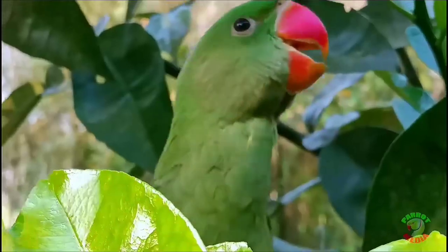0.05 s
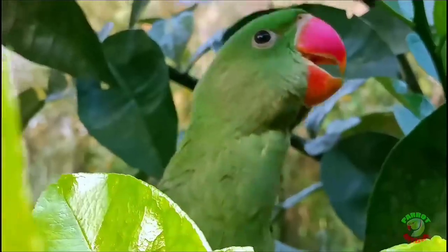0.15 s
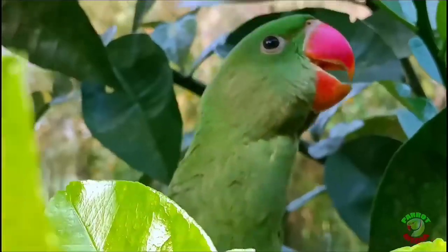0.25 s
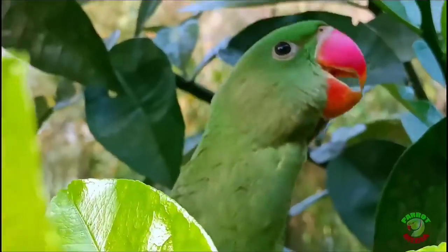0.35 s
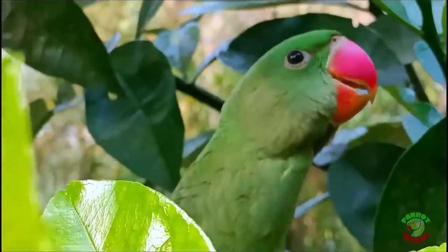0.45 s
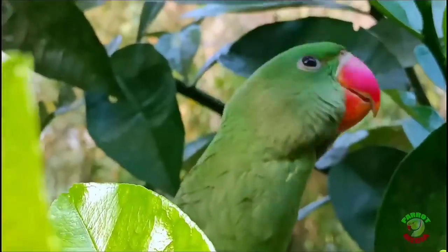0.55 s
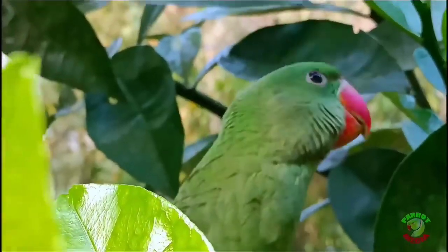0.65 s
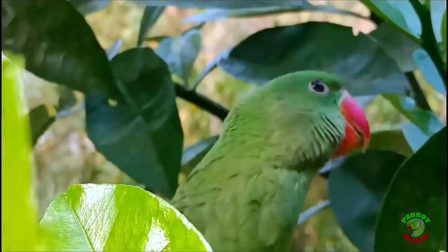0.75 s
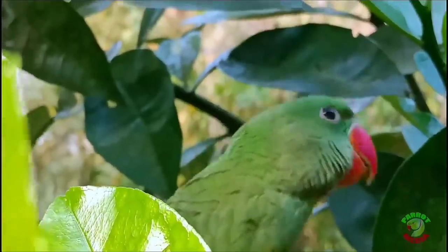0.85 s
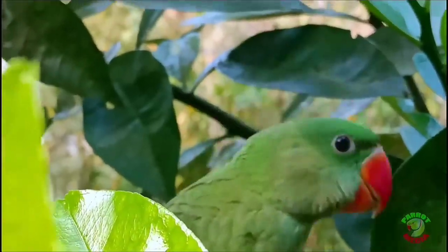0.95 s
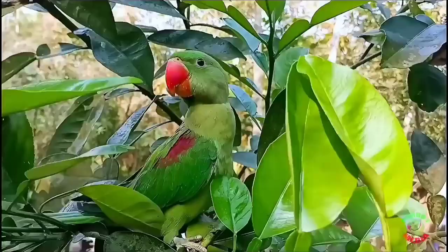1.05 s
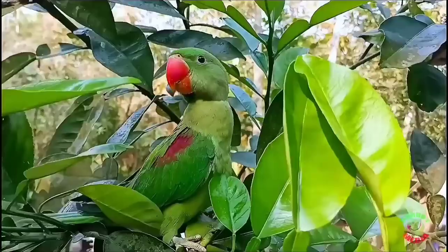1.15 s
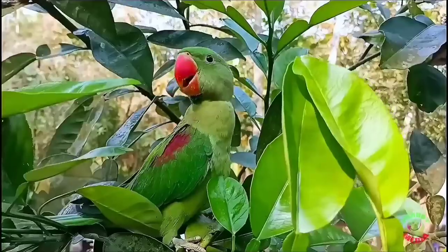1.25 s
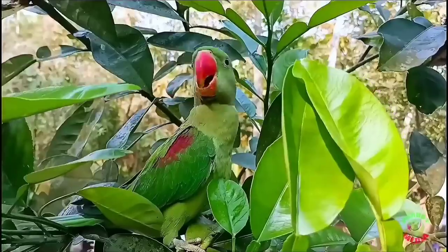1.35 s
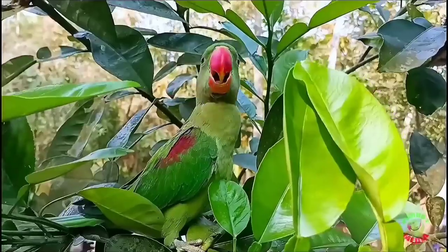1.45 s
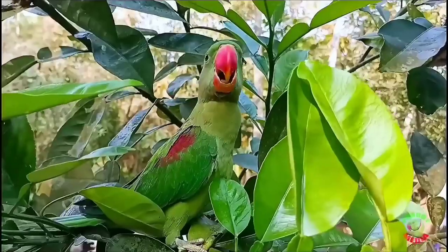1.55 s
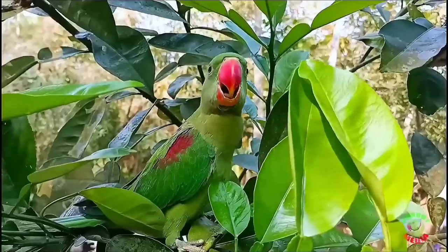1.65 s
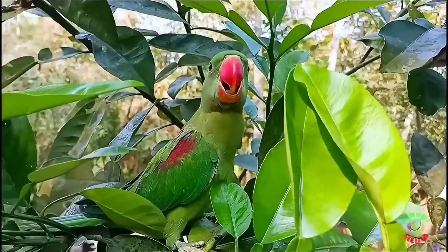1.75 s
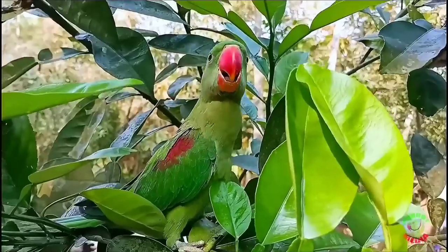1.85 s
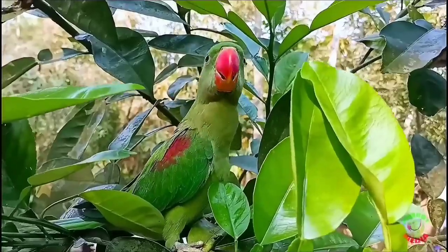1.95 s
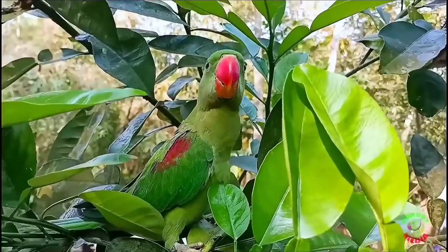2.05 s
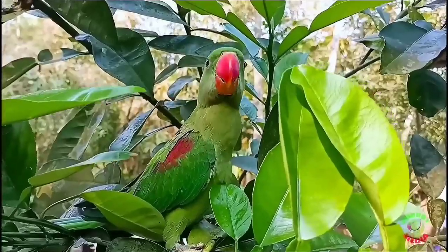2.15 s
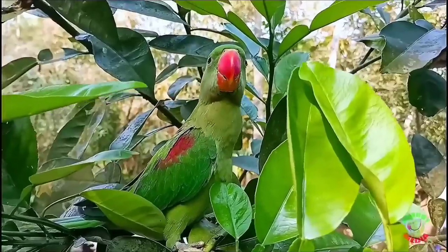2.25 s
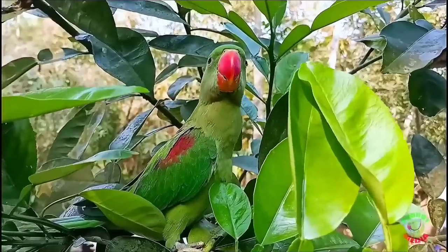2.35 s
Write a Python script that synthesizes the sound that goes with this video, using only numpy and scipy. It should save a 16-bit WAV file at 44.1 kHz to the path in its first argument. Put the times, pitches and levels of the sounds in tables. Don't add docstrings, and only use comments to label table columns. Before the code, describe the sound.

Two harsh parakeet calls of over half a second, buzzing and falling in pitch, separated by a quiet pause with tiny distant whistles and light rustle. Leafy outdoors, near stereo pickup, slightly overloaded, with faint echoes.

```python
import sys
import numpy as np
from scipy import signal
from scipy.fft import rfft, irfft
from scipy.io import wavfile
from scipy.ndimage import uniform_filter1d

SR = 44100
rng = np.random.default_rng(int(sys.argv[2]) if len(sys.argv) > 2 else 0)


def unload_audio(sound):
    columns = np.transpose(np.atleast_2d(sound))
    steps = np.round(np.clip(columns, -1, 1) * 32767)
    wavfile.write(sys.argv[1], SR, steps.astype(np.int16))


def makeup_ratio(level_db):
    decades = np.asarray(level_db, float) / 20
    return 10 ** decades


N = 108045


def evened(x):
    return x / np.sqrt(np.mean(abs(x) ** 2) + 1e-20)


def read(points, hz):
    f, value = np.transpose(points)
    return np.interp(np.log(hz + 1), np.log(f + 1), value)


def envelope(points, t):
    return np.interp(t, *np.transpose(points))


def smooth_noise(shape, hz):
    pole = np.exp(-2 * np.pi * hz / SR)
    z = rng.standard_normal(shape) + 1j * rng.standard_normal(shape)
    return evened(signal.lfilter([1], np.poly([pole] * 3), z))


def throbbing_pitch(curve, t, along):
    s, throbs, crest_hz, trough_hz = np.transpose(curve)
    turn = np.interp(t, s, throbs) % 1
    fall = np.clip(0.4 + 0.5 * along, 0.2, 0.8)
    phase = np.where(turn < fall, turn / fall, (1 - turn) / (1 - fall))
    low = np.sin(np.pi / 2 * phase) ** 2
    floor_hz = np.interp(t, s, trough_hz)
    hz = np.interp(t, s, crest_hz) * (1 - low) + floor_hz * low
    return hz * (1 + 0.003 * smooth_noise(len(t), 84).real), floor_hz


def syrinx(curve, t, along):
    pitch_hz, floor_hz = throbbing_pitch(curve, t, along)
    k = np.arange(1, 17)[:, None]
    hz = k * pitch_hz
    cycles = k * np.cumsum(pitch_hz) / SR + 0.0875 * k ** 3.0
    wave = np.exp(2j * np.pi * cycles) * (hz < SR / 2.6)
    wave = wave * makeup_ratio(2.2 * smooth_noise(wave.shape, 62).real)
    snap_db = 0.0356 * (pitch_hz - floor_hz) * along ** 2
    warm_up_db = -20 * np.clip(1 - (t - curve[0][0]) / 0.042, 0, 1) ** 0.5
    return hz, wave * makeup_ratio((snap_db + warm_up_db) * (k > 1))


def pipe_gain(pipe, mid_db, dips, hz, along):
    power, dip_db = 0, 0
    for (f, half_hz, early_db, late_db), bulge_db in zip(pipe, mid_db):
        peak_db = early_db + (late_db - early_db) * along + 4.6 * bulge_db * along * (1 - along)
        power = power + (makeup_ratio(peak_db) / (1 + ((hz - f) / half_hz) ** 2) ** 1.6) ** 2
    for f, half_hz, early_db, late_db in dips:
        depth_db = np.minimum(early_db + (late_db - early_db) * along, 0)
        dip_db = dip_db + depth_db / (1 + ((hz - f) / half_hz) ** 2)
    return np.sqrt(power) * makeup_ratio(dip_db)


# f/Hz, level/dB
RASP_FLOOR = [
    [(1800, -54), (2900, -42.5), (5000, -34.5), (8000, -39.5), (11500, -36), (15500, -45.5)],
    [(1800, -50), (2900, -27), (6500, -34), (8000, -38.5), (11500, -38.5), (15500, -38.5)],
]


def screech(curve, effort, pipes, mid_db, dips, lead):
    start_s, end_s = curve[0][0], curve[-1][0]
    at = np.arange(round(start_s * SR), round(end_s * SR))
    t = at / SR
    along = (t - start_s) / (end_s - start_s)
    hz, wave = syrinx(curve, t, along)
    k = np.arange(1, 17)[:, None]
    rasp_hz, rasp_same = 550, 0.5
    shared = smooth_noise(wave.shape, rasp_hz)
    depth = makeup_ratio(-19) * np.minimum(k / 3, 1)
    drift = np.clip(1.277 * along - 0.25, 0, 1)
    loudness = makeup_ratio(envelope(effort, t)) * np.minimum((end_s - t) / 0.0071, 1)
    out = np.zeros((2, N))
    for side, pipe in enumerate(pipes):
        own = smooth_noise(wave.shape, rasp_hz)
        rasp = rasp_same * shared + np.sqrt(1 - rasp_same ** 2) * own
        gain = pipe_gain(pipe, mid_db[side], dips[side], hz, drift)
        tones = gain * wave * (1 + depth * rasp)
        tones = tones + makeup_ratio(read(RASP_FLOOR[side], hz)) * wave * rasp
        tones = tones * np.exp(1j * (1 - side) * read(lead, hz))
        out[side, at] = tones.sum(0).real * loudness
    return out


# t/s, throbs done, crest f/Hz, trough f/Hz
FIRST_PITCH = [(.172, -2.2, 1320, 1290), (.196, -1.5, 1480, 1400), (.216, -1, 1670, 1575),
               (.246, 0, 1785, 1520), (.323, 2, 1690, 1310), (.401, 4, 1575, 1215), (.563, 8, 1325, 1100),
               (.65, 10, 1120, 1042), (.7, 11.1, 1066, 1000), (.738, 12, 930, 920)]
# t/s, level/dB
FIRST_EFFORT = [(0.17, -13), (0.193, 0), (0.21, 5.5), (0.253, -0.5), (.33, -1), (.45, -4.5), (.6, -5.5),
                (0.718, -10), (0.739, -39)]
# f/Hz, half width/Hz, early level/dB, late level/dB
FIRST_LEFT_PIPE = [(1510, 720, -28, -30.5), (2350, 1070, -13, -7), (3420, 186, -3.5, -13),
                   (4322, 233, -7.5, -2), (5736, 310, -13, -25.5), (6000, 230, -39, -35.5)]
FIRST_RIGHT_PIPE = [(1730, 1320, -23.5, -24), (2180, 190, -7.5, -9), (3207, 250, -8.5, -10),
                    (3800, 1600, -22, -19), (6523, 400, -20.5, -14.5), (8510, 700, -30.5, -40)]
FIRST_MID_DB = [
    [.3, -3, -1, 0.25, .3, .3],
    [.3, -0.27, .3, .3, 0.33, 0.38],
]
# f/Hz, half width/Hz, early level/dB, late level/dB
FIRST_DIPS = [
    [(1500, 81, 2.5, 1), (2640, 240, -12.5, -2), (5180, 220, -5.5, -6.5)],
    [(1510, 49, -10.5, 14), (2970, 200, -7.5, -3), (5200, 370, 3, -4.5)],
]
# f/Hz, lead/rad
FIRST_LEAD = [(1800, .6), (3360, 3.1), (3800, 2.1), (5900, 1.1), (6500, 2.4)]


def first_screech():
    pipes = FIRST_LEFT_PIPE, FIRST_RIGHT_PIPE
    return screech(FIRST_PITCH, FIRST_EFFORT, pipes, FIRST_MID_DB, FIRST_DIPS, FIRST_LEAD)


# t/s, throbs done, crest f/Hz, trough f/Hz
SECOND_PITCH = [(1.528, -2, 800, 800), (1.546, -1.6, 1330, 1290), (1.568, -1, 1510, 1430),
                (1.602, 0, 1835, 1460), (1.676, 2, 1815, 1420), (1.746, 4, 1650, 1345),
                (1.82, 6, 1530, 1235), (2.068, 12, 1265, 1068), (2.112, 13, 1150, 1035),
                (2.156, 14, 1055, 1000), (2.196, 15, 930, 880)]
# t/s, level/dB
SECOND_EFFORT = [(1.53, -28), (1.557, -6), (1.602, 1.5), (1.801, 0.5), (1.998, -3), (2.175, -7.5),
                 (2.194, -34)]
# f/Hz, half width/Hz, early level/dB, late level/dB
SECOND_LEFT_PIPE = [(1994, 1300, -17.5, -12.5), (2250, 290, -42.5, -7), (3410, 370, -12.5, -11.5),
                    (4466, 450, -17, -10), (5330, 180, -76, -3), (7220, 1400, -30, -43)]
SECOND_RIGHT_PIPE = [(1830, 770, -17.5, -16.5), (2249, 300, -4.5, -5.5), (2990, 770, -31, -4.5),
                     (4370, 880, -15.5, -19), (6707, 583, -11, -14), (9330, 580, -28.5, -31.5)]
SECOND_MID_DB = [
    [.3, .3, -0.85, .3, .3, 0.33],
    [.3, 0.5, -1, 0.33, .3, 0.43],
]
# f/Hz, half width/Hz, early level/dB, late level/dB
SECOND_DIPS = [
    [(1614, 100, -2, -19.5), (3130, 290, -18.5, 13), (3980, 140, 3, -1.5)],
    [(1680, 110, -3.5, -13.5), (3200, 67, -12, 2), (4160, 600, -2, -7)],
]
# f/Hz, lead/rad
SECOND_LEAD = [(1400, -0.27), (2330, -1.07), (3100, 2.5), (4130, 2.1), (4900, -0.8)]


def second_screech():
    pipes = SECOND_LEFT_PIPE, SECOND_RIGHT_PIPE
    return screech(SECOND_PITCH, SECOND_EFFORT, pipes, SECOND_MID_DB, SECOND_DIPS, SECOND_LEAD)


# t/s, level/dB, decay/s
CLICKS = [
    (.16, -40, .005),
    (.176, -41, .012),
    (1.524, -50, .006),
    (.727, -38, .008),
    (1.178, -55, .005),
]
# f/Hz, level/dB
CLICK_TONE = [(400, 2), (1000, 16.5), (4400, 11), (8000, -9), (15000, -24)]


def beak():
    t = np.arange(N) / SR
    level = np.zeros(N)
    for s, db, decay_s in CLICKS:
        level += makeup_ratio(db) * (t >= s) * np.exp(-np.maximum(t - s, 0) / decay_s)
    spectrum = rfft(level * rng.standard_normal(N))
    puffs = irfft(spectrum * makeup_ratio(read(CLICK_TONE, np.fft.rfftfreq(N, 1 / SR))), N)
    return puffs * np.ones((2, 1))


# delay/s, left level/dB, right level/dB
BOUGHS = [
    (.0011, -19, -15),
    (.0027, -19.5, -17),
    (.0062, -17.5, -18),
    (0.0139, -16, -22.5),
    (0.02, -28, -24.5),
]


def boughs(x):
    out = np.zeros(x.shape)
    for s, left_db, right_db in BOUGHS:
        out += makeup_ratio([[left_db], [right_db]]) * np.roll(x, round(s * SR), 1)
    return out


def tree_echo(x, decays):
    length, gap = SR // 2, 20
    taps = np.zeros((2, length))
    at = np.arange(200, length - gap, gap)
    at = at + rng.integers(0, gap, (2, len(at)))
    np.put_along_axis(taps, at, rng.choice([-1., 1.], at.shape), 1)
    hz, t, z = signal.stft(taps, SR, nperseg=256)
    decay_db = -60 * t / read(decays, hz)[:, None]
    tail = signal.istft(z * makeup_ratio(decay_db), SR, nperseg=256)[1]
    return signal.fftconvolve(x, tail / np.linalg.norm(tail[0]), axes=1)[:, :N]


# f/Hz, t60/s
TREES = [(900, 0.15), (2200, 0.22), (3100, 0.24), (6000, 0.12), (12000, 0.16)]


def near_trees(near, far):
    return tree_echo(makeup_ratio(-12.5) * near + makeup_ratio(-2) * far, TREES)


# f/Hz, t60/s
FAR_TREES = [(900, 0.25), (1500, 0.58), (2300, 0.7), (4400, 0.5), (6500, 0.23), (12000, 0.45)]


def far_trees(near):
    return tree_echo(makeup_ratio(-31) * near, FAR_TREES)


def wall(x):
    delay_s, level_db, smear_s, band_hz = 0.31, -44, 0.03, (1800, 4600)
    t = np.arange(4000) / SR
    smear = rng.standard_normal((2, len(t))) * np.exp(-t / smear_s)
    smear = signal.sosfilt(signal.butter(2, band_hz, "bandpass", fs=SR, output="sos"), smear)
    heard = signal.fftconvolve(x, smear / np.linalg.norm(smear[0]) / 3, axes=1)
    return makeup_ratio(level_db) * np.pad(heard, ((0, 0), (round(delay_s * SR), 0)))[:, :N]


# t/s, length/s, from f/Hz, to f/Hz, level/dB
FAR_NOTES = [(-.05, 0.27, 494.3, 577, -56), (0.047, 0.031, 3580, 3584, -61),
             (0.89, 0.042, 3600, 3810, -58.5), (1.109, 0.04, 4230, 3520, -59),
             (1.068, 0.044, 5500, 4700, -59), (1.087, .085, 4700, 3930, -49.5),
             (1.136, 0.022, 3900, 3470, -61), (1.151, 0.012, 3420, 3400, -51),
             (1.246, 0.017, 1540, 1580, -54), (1.251, 0.031, 924, 943, -55.5),
             (1.277, 0.12, 955, 1043, -69), (1.038, 0.033, 5800, 5840, -67),
             (1.258, 0.061, 2350, 2410, -65.5), (1.318, 0.037, 1736, 1744, -61),
             (1.342, 0.049, 1576, 1567, -67), (2.246, 0.059, 2275, 2274, -51.5),
             (2.319, 0.035, 2188, 2320, -57.5), (2.377, 0.069, 2228, 2264, -53.5)]


def far_birds():
    t, out = np.arange(N) / SR, np.zeros(N)
    fuzz = 1 + 0.6 * smooth_noise(N, 120)
    for s, length_s, from_hz, to_hz, db in FAR_NOTES:
        u = np.clip((t - s) / length_s, 0, 1)
        glide = np.exp(2j * np.pi * np.cumsum(from_hz + (to_hz - from_hz) * u) / SR)
        swell = np.sin(np.pi * u) ** 0.5 * (u < 1) * (u > 0)
        out += makeup_ratio(db) * np.sqrt(2) * swell * (glide * fuzz).real
    return out * makeup_ratio([[2], [-2]])


# f/Hz, level/dB per Hz
AIR = [(15, -27), (30, 1), (299, -12), (572, -8.5), (1590, -19), (2200, -15), (4330, -10.5), (5820, -17),
       (15800, -25)]
# t/s, level/dB
RUSTLE = [(0, -5), (0.141, -3), (0.801, -5.5), (.97, -14.5), (1.051, -10.5), (1.2, -3), (1.4, 0),
          (1.499, -4), (2.2, -0.5), (2.45, -26)]
# f/Hz, share
SAME = [(40, .9), (300, .75), (700, .7), (1500, .4), (3000, .1)]


def air():
    frames, hz = N // 256 + 5, np.fft.rfftfreq(1024, 1 / SR)
    a, b, c, d, patches = rng.standard_normal((frames, 513, 5)).T
    patches = evened(uniform_filter1d(uniform_filter1d(patches, 6, 0), 10, 1))
    hiss_db = envelope(RUSTLE, np.arange(frames) * 256 / SR) * np.clip(hz / 3000, 0, 1)[:, None]
    same = np.clip(read(SAME, hz), -1, 1)[:, None]
    left = a + 1j * b
    right = same * left + np.sqrt(1 - same ** 2) * (c + 1j * d)
    z = np.array([left, right]) * makeup_ratio(read(AIR, hz)[:, None] + 2 * patches + hiss_db)
    return makeup_ratio(-55.5) * evened(signal.istft(z, nperseg=1024, noverlap=768)[1][:, :N])


# start t/s, end t/s, from f/Hz, to
# f/Hz, half width/Hz
MASKED = [(.243, .7, 2280, 1500, 310), (1.585, 2.19, 2400, 1450, 310), (.245, .4, 1060, 980, 90),
          (1.585, 1.65, 1000, 1000, 170), (1.65, 2.1, 1100, 830, 70), (.54, .69, 3020, 2750, 150),
          (1.58, 1.79, 4120, 3650, 130), (1.84, 2.15, 3280, 2650, 150), (.225, .5, 13300, 12000, 1000),
          (.5, .735, 11700, 10200, 550), (.2, .4, 15300, 14200, 400), (.22, .33, 9300, 9200, 200),
          (1.6, 1.92, 13450, 13600, 900), (1.92, 2.17, 13100, 12100, 600), (1.54, 2.17, 11000, 10700, 300),
          (1.62, 1.685, 11200, 11200, 500), (1.825, 1.945, 7900, 7900, 260), (1.94, 2.12, 8450, 8500, 170),
          (2.08, 2.17, 8750, 8800, 160), (0, .17, 15700, 15500, 800), (.74, 1.55, 15700, 15500, 700),
          (2.2, 2.5, 15700, 15500, 800)]
# t/s, threshold at 12 kHz/deviations
SPARSE = [(0, -1.3), (.7, -1.3), (.8, .2), (1, .6), (1.06, -.8), (1.2, -1.2), (2.2, -1.2), (2.45, -.4)]


def masked(x):
    lost_db = -55
    hz, t, z = signal.stft(x, SR, nperseg=1024, noverlap=768)
    hz = hz[:, None]
    edge = 0.25 * evened(uniform_filter1d(rng.standard_normal((2, len(MASKED), len(t))), 5))
    db = np.zeros(z.shape)
    for k, (start_s, end_s, from_hz, to_hz, half_hz) in enumerate(MASKED):
        centre_hz = from_hz + (to_hz - from_hz) * (t - start_s) / (end_s - start_s)
        reach_hz = half_hz + min(half_hz, 700) * edge[:, k, None]
        db += lost_db * (abs(hz - centre_hz) < reach_hz) * (t > start_s) * (t < end_s)
    strips = rng.standard_normal(z.shape[1:])
    strips = uniform_filter1d(strips, size=11, axis=1)
    strips = evened(uniform_filter1d(strips, size=7, axis=0))
    threshold = envelope(SPARSE, t) + 0.1 * (hz / 1000 - 12)
    db += lost_db * (strips < threshold) * (hz > 5200)
    return signal.istft(z * makeup_ratio(db), SR, nperseg=1024, noverlap=768)[1][:, :N]


def late(x, lag_samples):
    return np.array([np.roll(x[0], lag_samples), x[1]])


def scene():
    near = late(first_screech() + second_screech() + beak(), 8)
    far = late(far_birds(), 20)
    echoes = boughs(near) + near_trees(near, far) + far_trees(near) + wall(near)
    return near + far + echoes + air()


def top_cut(x):
    return signal.sosfilt(signal.butter(12, 15650, fs=SR, output="sos"), x)


def record(dry):
    rounded = np.tanh(dry / 1.286) * 1.308
    return top_cut(masked(rounded))


dry = scene()
out = record(dry)
unload_audio(out)
```